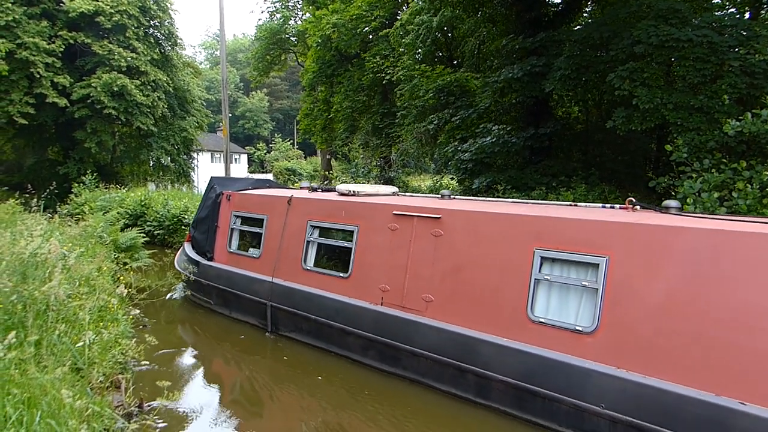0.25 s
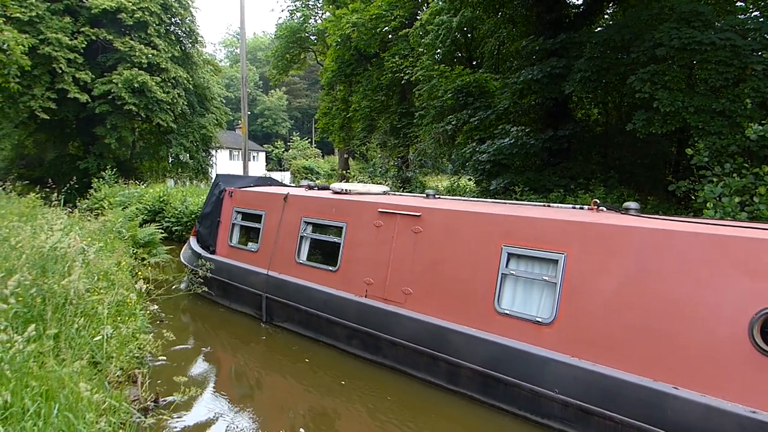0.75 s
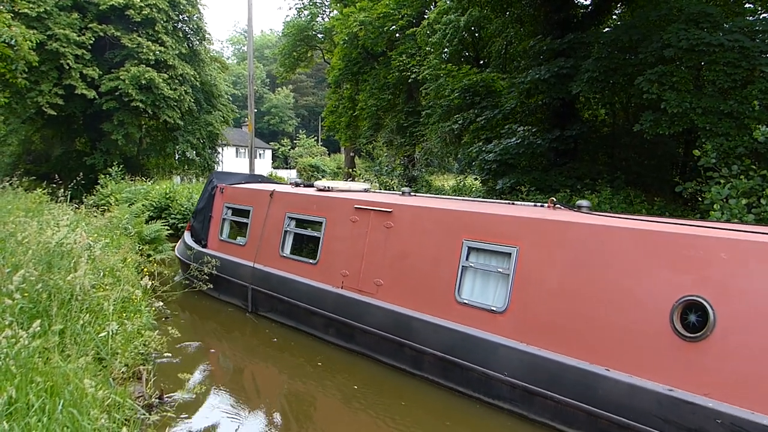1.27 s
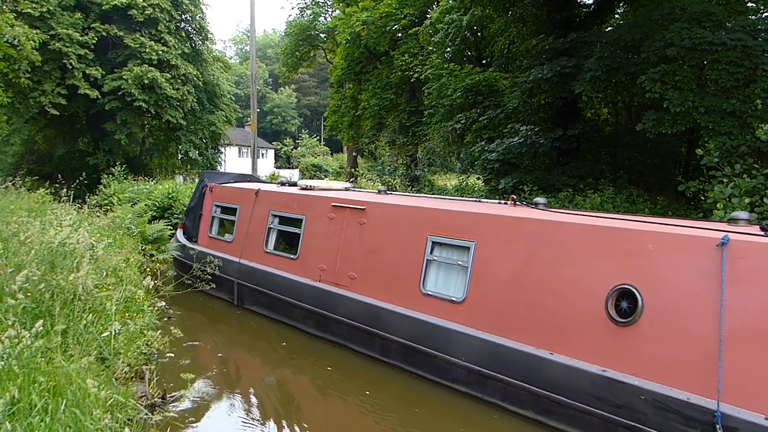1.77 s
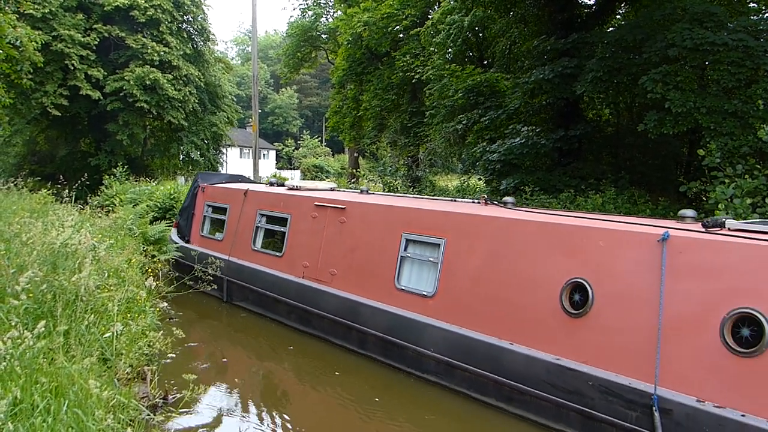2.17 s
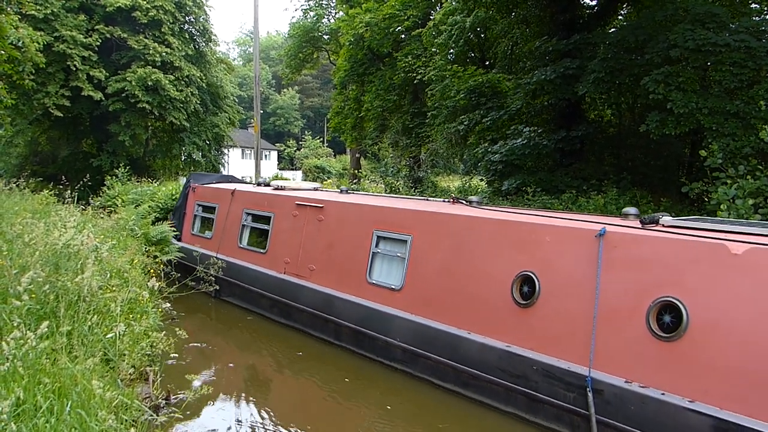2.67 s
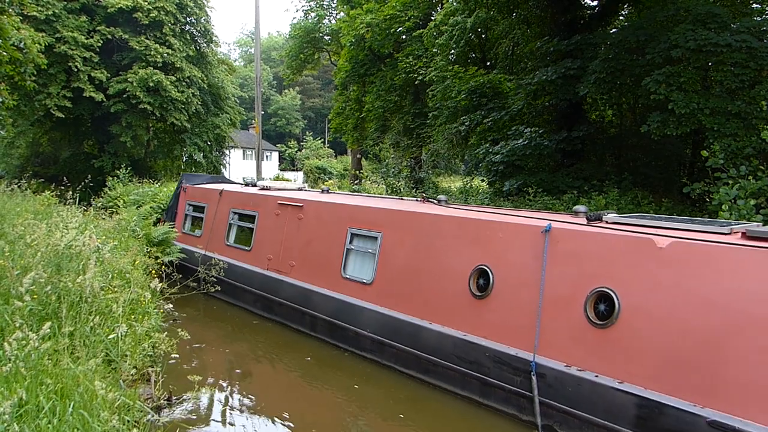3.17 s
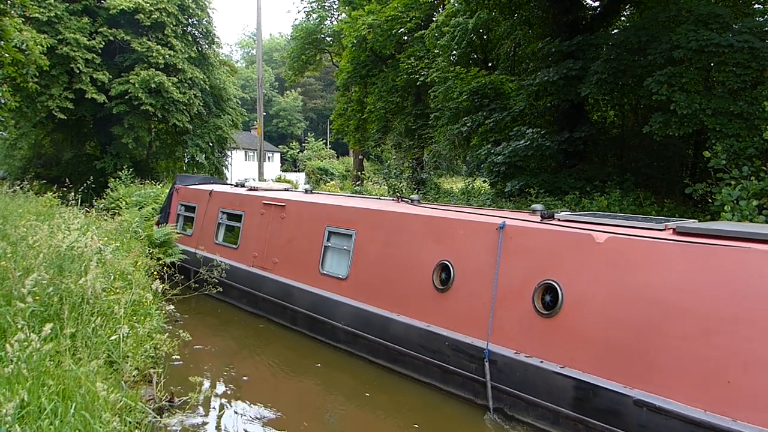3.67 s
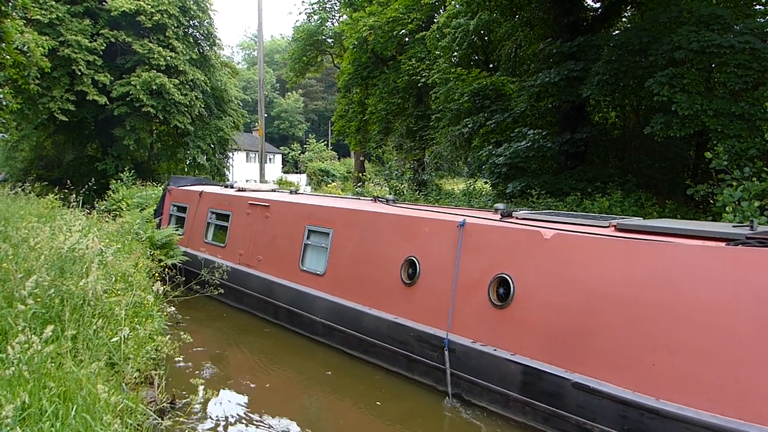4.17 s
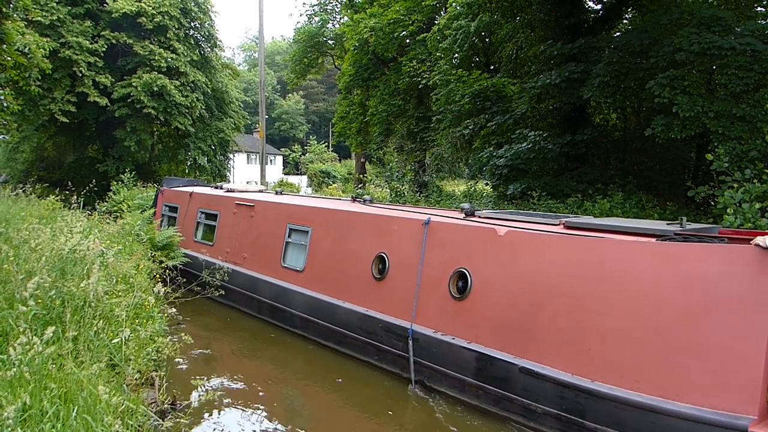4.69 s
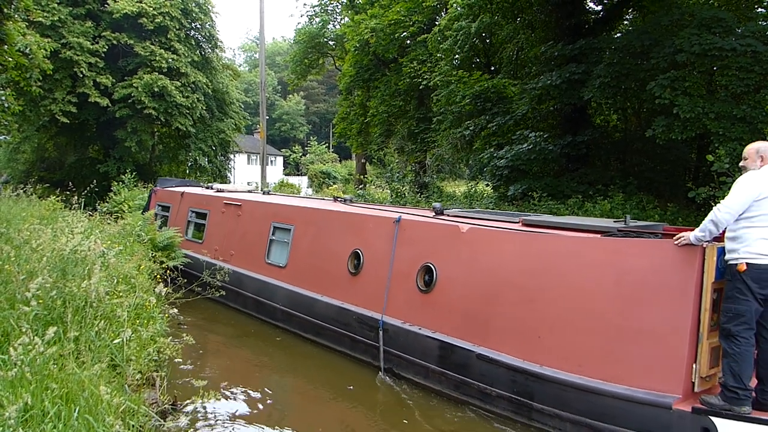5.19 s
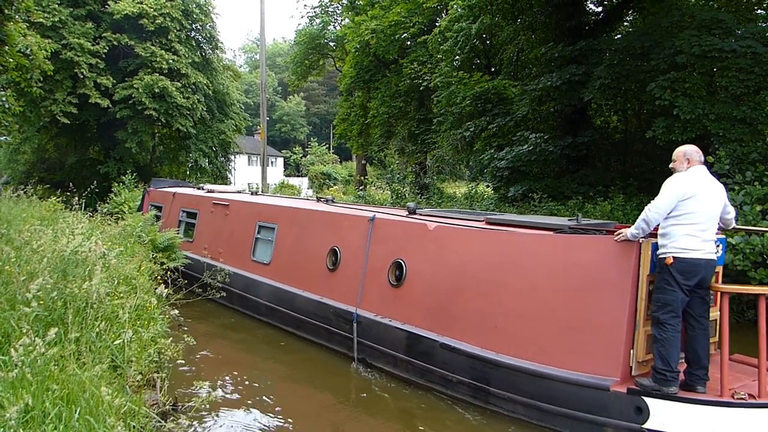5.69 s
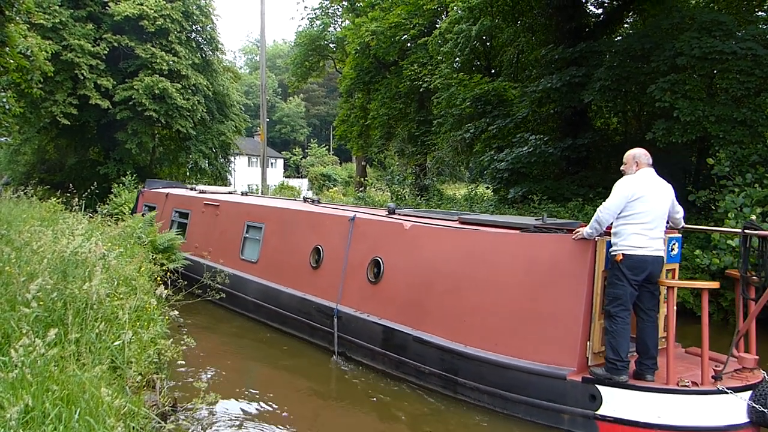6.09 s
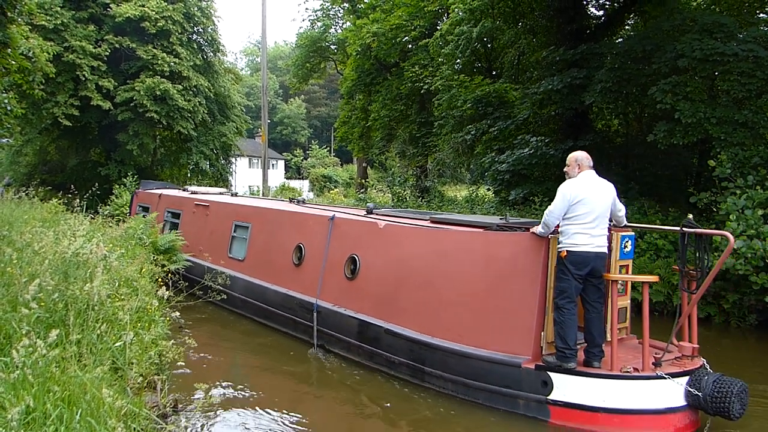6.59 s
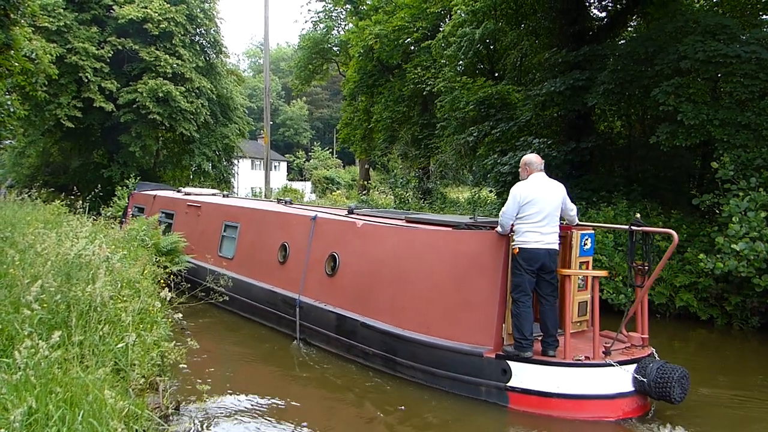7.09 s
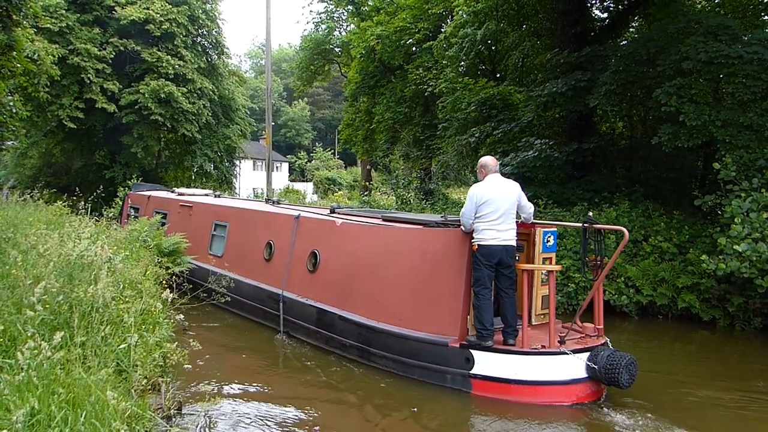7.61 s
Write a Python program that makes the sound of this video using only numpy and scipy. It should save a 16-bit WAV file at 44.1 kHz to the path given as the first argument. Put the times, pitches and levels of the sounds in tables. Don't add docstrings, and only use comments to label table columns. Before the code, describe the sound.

A narrow steel canal boat glides past at tick-over, close to a small stereo microphone on the grassy bank. A low bass hum underlies fast, uneven diesel knocks that ring and rattle the hull panels, mostly on the right. A bird whistles faintly over the leaves. After about four and a half seconds the stern comes by with pulsing exhaust hiss, gurgling cooling water, propeller wash, drops and light metal taps.

```python
import sys
import numpy as np
from scipy import signal
from scipy.fft import rfft, irfft, next_fast_len
from scipy.io import wavfile
from scipy.ndimage import uniform_filter1d, map_coordinates

SR = 44100
rng = np.random.default_rng(int(sys.argv[2]) if len(sys.argv) > 2 else 0)


def generate_wav(signal):
    frames = np.transpose(np.atleast_2d(signal))
    scaled = np.clip(frames, -1, 1) * 32767
    pcm = np.round(scaled).astype(np.int16)
    wavfile.write(sys.argv[1], SR, pcm)


def linear_from_db(decibels):
    return 10 ** (np.asarray(decibels, float) / 20)


N = 346185
T = np.arange(N) / SR

# [knock in low, middle, high and stern panels/dB, valve tick/dB, lateness/ms]
CYLINDERS = [
    (-3, -4.5, 3, -5, 6, 0.543),
    (1.5, -2.7, 11.3, -5.5, 1, 0.),
    (-5, -2, 7.3, -5, 0, 0.515),
    (-17, -0.5, 2.4, -4.5, -29, 0.98),
]
# [f/Hz, width/Hz, level/dB, panel group (whole part: low, middle, high, stern)]
PANELS = [(945, 74, 1.5, 0), (1060, 205, 4, 0), (730, 61, -10.5, -0.5), (1350, 190, 3.5, 1),
          (1600, 142, 6, 1.5), (2788, 290, 1, 2), (2473, 290, -2.5, 1), (1952, 115, 3, 3),
          (3310, 180, -5, 3.5), (4010, 330, -9, 3), (2860, 100, -10, 3), (4000, 230, -11.5, 3)]
# [t/s, peak level/dB, f/Hz]
HARD_KNOCKS = [(0.029, -13.5, 970), (0.304, -10, 1550), (0.413, -18, 1590), (0.491, -16, 1660),
               (0.525, -13.5, 1560), (0.55, -18.5, 930), (0.633, -15, 1550), (0.742, -16, 1590),
               (0.768, -15.5, 1420), (0.796, -16.5, 940), (0.905, -16, 960), (0.934, -16.5, 1610),
               (1.071, -18.5, 1410), (1.123, -15, 1530), (1.182, -15, 1550), (1.341, -18, 1570),
               (1.4, -16, 1480), (1.453, -17, 945), (1.509, -15.5, 1540), (1.538, -13, 1390),
               (1.563, -12.5, 1520), (1.62, -15.5, 1600), (1.65, -14, 1420), (1.674, -12, 975),
               (1.73, -16, 1400), (1.784, -13.5, 1010), (1.869, -19, 885), (1.951, -17, 1080),
               (2.088, -16, 930), (2.224, -10, 990), (2.278, -13, 1510), (2.332, -10.5, 945),
               (2.388, -18, 1060), (2.443, -12.5, 1020), (2.549, -14, 980), (2.609, -15, 1090),
               (2.636, -10, 1130), (2.662, -13.5, 990), (2.745, -14, 1360), (2.878, -18, 930),
               (2.938, -17, 1100), (2.965, -15, 1250), (2.994, -9.5, 945), (3.406, -17, 930),
               (3.568, -17, 1580), (3.6, -13.5, 1540), (3.625, -14, 1100), (3.65, -12.5, 980),
               (3.707, -10, 1060), (3.738, -15, 1070), (3.869, -11.5, 1040), (3.93, -15, 1040),
               (3.98, -13, 960), (4.04, -15, 1500), (4.067, -15, 1100), (4.091, -12, 1030),
               (4.204, -11, 980), (4.315, -13, 1030), (4.37, -16.5, 1130), (4.421, -13, 920)]
# [t/s, level/dB]
CHURN = [(0, -40), (1.5, -39.5), (3, -37), (4.4, -33.5), (4.75, -32), (5.05, -30.5), (5.15, -34.5),
         (5.22, -29), (6, -33.5), (6.5, -34), (7.1, -31), (7.3, -34.5), (7.36, -37), (7.65, -35.5),
         (7.85, -37.5)]


def evened(x):
    return x / np.sqrt(np.mean(x ** 2) + 1e-20)


def columns(rows, t):
    s, *values = np.transpose(rows)
    return [np.interp(t, s, v) for v in values]


def colour(x, points):
    f, db = np.transpose(points)
    size = next_fast_len(N + 8192, True)
    bins = np.fft.rfftfreq(size, 1 / SR)
    gain = linear_from_db(np.interp(np.log(bins + 1), np.log(f + 1), db))
    return irfft(rfft(x, size) * gain, size)[..., :N]


def resonate(x, hz, width, order=1):
    turn = np.exp(2j * np.pi * np.cumsum(hz * np.ones(x.shape[-1])) / SR)
    r = np.exp(-np.pi * width / SR)
    smooth = signal.lfilter([(1 - r) ** order], np.poly([r] * order), x * turn.conj())
    return 2 * (turn * smooth).real


def ring(x, hz, width):
    r, turn = np.exp(-np.pi * width / SR), 2 * np.pi * hz / SR
    stage = [2 * (1 - r) * np.sin(turn), 0, 0, 1, -2 * r * np.cos(turn), r * r]
    return signal.sosfilt([stage, stage], x)


def packet(hz, rise_s, fall_s, turn=0., glide=0.):
    t = np.arange(-5 * rise_s, 5 * fall_s, 1 / SR)
    shape = np.exp(np.where(t < 0, t / rise_s, -t / fall_s))
    return 5 * rise_s, shape * np.cos(2 * np.pi * (hz * t * (1 + glide * t) + turn))


def wander(per_s):
    knots = np.arange(0, N / SR + 1, 1 / per_s)
    drift = np.interp(T, knots, rng.standard_normal(400)[:len(knots)])
    return evened(uniform_filter1d(drift, int(SR / per_s)))


def add(mix, s, sound):
    at = max(round(s * SR), 0)
    part = mix[..., at:at + sound.shape[-1]]
    part += sound[..., :part.shape[-1]]


def placed(x, pan_db, lag=2):
    share = linear_from_db(pan_db) / (1 + linear_from_db(pan_db))
    return 2 * np.array([share * np.roll(x, lag), (1 - share) * x])


def delayed(x, s):
    return map_coordinates(x, [np.arange(N) - s * SR], order=3, mode="mirror")


def facing(at_s, peak_db, before, after, opening_db):
    opening_s, turn_s = 0.38, 0.49
    past = turn_s * np.logaddexp(0, (T - at_s) / turn_s)
    opening = np.clip(1 - T / opening_s, 0, 1)
    return peak_db + before * (T - at_s) + (after - before) * past + opening_db * opening


def in_view():
    clear_s, softness_s = 4.33, 0.7
    return 1 / (1 + np.exp((clear_s - T) / softness_s))


def water_db(rest_db, of_churn, view_db, of_surge):
    # [t/s, level/dB]
    surges = [
        (.06, 10.5),
        (4.72, 2),
        (5.02, -8),
        (5.2, -3),
        (5.64, 5.5),
        (6.96, 2),
        (7.1, -2),
        (7.28, 8.5),
        (7.6, 9),
    ]
    rise_s, fall_s, calm_db = 0.021, 0.098, -42
    surge_db = sum(db * np.exp(np.where(T < s, (T - s) / rise_s, (s - T) / fall_s)) for s, db in surges)
    churn_db = columns(CHURN, T)[0] - calm_db
    return rest_db + of_churn * churn_db + view_db * in_view() + of_surge * surge_db


def engine_cycles():
    # [t/s, cycle rate f/Hz]
    speed = [(0.0, 9.0856), (0.491, 9.1378), (0.981, 9.1191), (1.472, 9.0893), (1.962, 9.1073),
             (2.453, 9.1119), (2.944, 9.1015), (3.434, 9.0838), (3.925, 9.0684), (4.416, 9.061),
             (4.906, 9.0766), (5.397, 9.0968), (5.887, 9.0621), (6.378, 9.0492), (6.869, 9.0803),
             (7.359, 9.0681), (7.85, 9.0915)]
    return np.cumsum(columns(speed, T)[0]) / SR - .0249


def firing_times(cycles, late):
    return np.interp(np.arange(1, int(cycles[-1] * 4) + 2) / 4 + late, cycles, T, right=N / SR)


def exhaust(cycles):
    # [f/Hz, level/dB]
    pipe = [(30, -89), (55, -62), (73, -66), (109, -30.3), (145, -30.8), (182, -56), (230, -80),
            (900, -150)]
    # [f/Hz, level/dB]
    thump = [(40, -101), (64, -73), (82, -63), (100, -43.5), (127, -54), (165, -40.5), (195, -55),
             (218, -74), (245, -57.5), (300, -52), (360, -101), (381, -42.5), (400, -96), (900, -150)]
    # [f/Hz, level/dB]
    outlet = [(120, -120), (182, -139), (218, -38), (254, -38.5), (291, -54), (327, -45), (364, -47.5),
              (400, -52), (480, -107), (1200, -150)]
    boom_db = (0.8, -2, -1.1, 4)
    booms, puffs, thumps = np.zeros((3, N))
    luck = rng.standard_normal((400, 4))
    firings = firing_times(cycles, -.25)
    for k, s in enumerate(firings):
        add(booms, s + .0085, linear_from_db([boom_db[k % 4] + .5 * luck[k, 0]]) * SR / 72)
        add(puffs, s + .0119 + .0002 * luck[k, 1], linear_from_db([2. * luck[k, 2]]) * SR / 72)
    for k, s in enumerate(firings[::4]):
        add(thumps, s + .0603 + .0003 * luck[k, 1], linear_from_db([1.1 * luck[k, 3]]) * SR / -18)
    shake = linear_from_db(-43.5 + 0.55 * wander(21.0)) * np.cos(2 * np.pi * (8 * cycles - .43))
    boom = colour(booms, pipe) + colour(thumps, thump) + shake
    boom_facing_db = facing(at_s=4, peak_db=-0.5, before=0.5, after=-0.67, opening_db=1.2)
    puff_facing_db = facing(at_s=4, peak_db=1, before=1.6, after=-1.8, opening_db=.1)
    return placed(linear_from_db(boom_facing_db) * boom + linear_from_db(puff_facing_db) * colour(puffs, outlet), 0, lag=3)


def knocks(cycles):
    count, run_s, run_gain_db, blow_spread_db = 5, .009, 2., 2.
    panel_spread_db, give_way_db = 1.5, -12
    damping = 1.4
    sag_per_s = (0, .015, 0, 0)
    groups, s = np.zeros((4, N)), firing_times(cycles, 0)
    cylinder = np.array(CYLINDERS)[(np.arange(len(s)) + 1) % 4]
    luck = rng.standard_normal((len(s), len(PANELS) + 1, count + 1))
    place = (np.arange(count) + rng.random((len(s), count))) / count
    blow_s = s[:, None] + cylinder[:, 5:] / 1000 - 0.005 + run_s * place
    at = np.clip(blow_s * SR, 0, N - 1).astype(int)
    covered = abs(s[:, None] - 0.002 - np.array(HARD_KNOCKS)[:, 0]).min(1) < 0.009
    for j, (hz, width, db, group) in enumerate(PANELS):
        g, blows = int(group), np.zeros(N)
        firing_db = db + cylinder[:, g] + panel_spread_db * luck[:, j, 0] + luck[:, -1, 0]
        firing_db = firing_db + give_way_db * covered * (g < 2)
        blow_db = firing_db[:, None] + run_gain_db * place + blow_spread_db * luck[:, -1, 1:]
        np.add.at(blows, at, linear_from_db(blow_db) * np.sign(luck[:, j, 1:]) / width)
        if sag_per_s[g]:
            groups[g] += resonate(blows, hz * (1 - sag_per_s[g] * T), damping * width, order=2)
        else:
            groups[g] += ring(blows, hz, damping * width)
    return groups


def rattle(cycles):
    size = next_fast_len(N)
    f, rings = np.fft.rfftfreq(size, 1 / SR), np.zeros((4, 1, size // 2 + 1))
    for hz, width, db, group in PANELS:
        off = (f - hz) / width
        rings[int(group), 0] += linear_from_db(db) / np.sqrt(1 + off ** 2) / (1 + (off / 0.82) ** 2)
    shake_db = 1.24 * wander(30.) + 2.6 * np.cos(2 * np.pi * (4 * cycles + 0.26))
    shake = rng.standard_normal((2, N)) * linear_from_db(shake_db)
    return irfft(rings * rfft(shake, size), size)[..., :N]


def hard_knocks(level_db):
    # [t after its start/s, level/dB]
    hard_run = [
        (-.0005, -8),
        (.0025, -4),
        (.006, -8),
    ]
    out = np.zeros(N)
    for s, db, hz in HARD_KNOCKS:
        lead, sound = packet(hz, 0.0009, 0.0018)
        for late, blow_db in hard_run:
            add(out, s + late + rng.random() / hz - lead, linear_from_db(db + blow_db - 1.9) * sound)
        for other_hz, _, panel_db, group in PANELS:
            lead, sound = packet(other_hz, 0.0011, 0.0016, turn=rng.random())
            spread_db = panel_db + level_db[int(group)][round(s * SR)] + 18.0
            add(out, s + 0.00194 - lead, linear_from_db(db + spread_db) * sound)
    return out


def hull(cycles):
    # [t square on/s, level then/dB, slope before/(dB/s), slope
    # after/(dB/s), shift at the opening/dB]
    group_facing = [
        (5.1, -33, 1.3, -5, -2),
        (5.7, -41.5, -0.44, -9.5, 2.5),
        (1.57, -38.5, 2.8, -2.5, -16),
        (7.2, -43.5, 3.5, 2, 25),
    ]
    level_db = [facing(*row) for row in group_facing]
    knock_groups, rattle_groups = knocks(cycles), rattle(cycles)
    knock_over_rattle = linear_from_db(np.array([6.5, 6.5, 2, 0]))
    share = knock_over_rattle / np.sqrt(1 + knock_over_rattle ** 2)
    near, wide = hard_knocks(level_db), np.zeros(N)
    for g in range(4):
        knock = share[g] * evened(knock_groups[g])
        between = np.sqrt(1 - share[g] ** 2) * evened(rattle_groups[g, 0])
        near += linear_from_db(level_db[g]) * (knock + between)
        wide += linear_from_db(level_db[g] - 19.0) * evened(rattle_groups[g, 1])
    return placed(near, -23.5 + 2.5 * T) + wide * [[1], [0]]


def valves(cycles):
    out = np.zeros(N)
    for k, (s, (a, b)) in enumerate(zip(firing_times(cycles, 0.01147), rng.standard_normal((400, 2)))):
        lead, sound = packet(4110 + 80 * a, 0.0008, 0.0018)
        add(out, s - lead, linear_from_db(CYLINDERS[(k + 1) % 4][4] + 3 * b) * sound)
    level_db = facing(at_s=3.5, peak_db=-37.5, before=2.2, after=-1, opening_db=9)
    return placed(linear_from_db(level_db) * out, 5.0)


def gurgle():
    out = np.zeros((2, N))
    for u, p, size, side in rng.random((400, 4)):
        hz = 330 * 4.52 ** p
        sound = packet(hz, 1. / hz, 8.9 / hz, glide=0.0142 * hz)[1]
        level_db = -2. * np.log(size + 0.019)
        add(out, u * N / SR, linear_from_db(level_db) * placed(sound, -4. + 8.8 * (side - .5), lag=0))
    return evened(out)


def stern(cycles):
    # [t/s, fizz f/Hz, hiss f/Hz]
    glance = [(0, 9700, 4980), (.35, 10100, 5800), (.7, 10900, 5500), (1.5, 10100, 5430), (2.4, 9300, 5530),
              (2.6, 10500, 5600), (3.4, 10300, 5440), (3.7, 9150, 5530), (4.5, 9060, 5500),
              (7.85, 8460, 5860)]
    # [f/Hz, level/dB]
    fizz_colour = [(3820, -60), (6300, -8), (7040, 3.5), (8820, -1), (10100, -5), (13000, -20.5),
                   (14400, -22), (15500, -46)]
    hiss_db = water_db(rest_db=-45, of_churn=0.4076, view_db=-1.5, of_surge=0.32)
    fizz_db = water_db(rest_db=-51, of_churn=1.07, view_db=-5, of_surge=0.27)
    gurgle_db = water_db(rest_db=-54, of_churn=0.01, view_db=8, of_surge=1.81)
    fizz_hz, hump_hz = columns(glance, T)
    puff = np.cos(2 * np.pi * (4 * cycles + 0.32))
    a, b, c = rng.standard_normal((3, N))
    port_lag_s = 70e-6 * (1 - in_view())
    pair = np.array([delayed(a, port_lag_s) + 0.8 * b, a + 1.1 * c])
    off_water = np.array([delayed(pair[0], 1.06 * 3 / fizz_hz), delayed(pair[1], 3 / fizz_hz)])
    pair += .4 * in_view() * off_water
    sparks = linear_from_db(7 * np.minimum(rng.exponential(1, N), 4.)) * (rng.random(N) < 900 / SR)
    grit = 1 + .3 * evened(signal.lfilter([1], [1, -.97], sparks))
    pair *= grit * linear_from_db(1.14 * wander(25.))
    hiss = evened(resonate(pair * linear_from_db(1.5 * puff), hump_hz, 1760, order=2))
    fizz = evened(colour((pair - 0.051 * pair.mean(0)) * linear_from_db(3.3 * puff), fizz_colour))
    fizz = evened(fizz + 0.57 * in_view() * resonate(fizz, fizz_hz, 420))
    lean = linear_from_db(np.array([[.25], [-.25]]))
    return lean * (linear_from_db(hiss_db) * hiss + linear_from_db(fizz_db) * fizz) + linear_from_db(gurgle_db - 4.0) * gurgle()


def glints(cycles):
    # [t/s, half length/s, f/Hz, slope/(Hz/s), width/Hz]
    glint_rows = [(2.5, .55, 6750, -300, 400), (.5, .35, 6400, -700, 500), (1.5, .6, 8300, -400, 500),
                  (7.2, .6, 7700, 0, 400), (.15, .25, 9700, 0, 900), (1.25, .55, 10450, -650, 700),
                  (2., .5, 9500, -800, 600), (3., .5, 10600, 300, 900), (4.1, .55, 8750, 0, 600),
                  (1., .7, 11700, 0, 600), (1., .9, 3320, -60, 330), (.55, .45, 4650, 0, 400),
                  (1.3, .6, 5600, -500, 600), (2.6, .8, 5250, 0, 600), (2.3, .6, 3900, 0, 300),
                  (6.3, 1.5, 12900, 0, 1500), (4.1, .5, 12000, 0, 2500)]
    glint_db = [-48, -55, -64, -57, -54, -55.5, -55, -57, -46, -70, -47, -42, -49, -56, -56, -63, -65]
    out = np.zeros(N)
    for (s, half, hz, slope, width), db in zip(glint_rows, glint_db):
        span = slice(round(max(s - 2 * half, 0) * SR), round((s + 2 * half) * SR))
        t = T[span] - s
        pulse = np.cos(2 * np.pi * (4 * cycles[span] + (.33 if hz > 5000 else .05)))
        gas = rng.standard_normal(len(t)) * linear_from_db(5 * pulse)
        band = evened(resonate(gas, hz + slope * t, width, order=2))
        out[span] += linear_from_db(db - 7 * (t / half) ** 2) * band
    return np.array([linear_from_db(-6.0) * np.roll(out, 3), out])


def wash():
    # [f/Hz, level/dB]
    wash_colour = [(110, -22), (180, -2), (249, -13.5), (278, -5.5), (336, -1.5), (570, -10.5), (980, 1.5),
                   (1710, -11.5), (1930, -11), (2400, -18), (4600, -19.5), (5980, -48), (10100, -120)]
    # [t/s, peak level/dB, f/Hz]
    glugs = [(4.535, -14, 960), (4.611, -27, 930), (4.666, -12.5, 800), (4.75, -11.5, 1060),
             (4.783, -17, 990), (4.862, -19, 920), (4.976, -7, 934), (5.115, -14, 1390), (5.187, -37, 960),
             (5.25, -22, 810), (5.526, -8, 990), (5.635, -10, 980), (5.744, -15, 1010), (6.012, -11, 1000),
             (6.076, -11, 1030), (6.295, -32, 1010), (6.382, -13, 1020), (6.517, -17, 1020),
             (6.784, -10, 1200), (7.092, -8, 1180), (7.195, -8, 844), (7.678, -22, 1080)]
    a, b, c = rng.standard_normal((3, N))
    lumps = linear_from_db(columns(CHURN, T)[0] + 1.4 * wander(40.) + .4 * wander(8.))
    pair = np.array([np.roll(a, 3) + 0.5 * b, a + 0.78 * c])
    out = lumps * evened(colour(pair, wash_colour)) * linear_from_db([[-2.5], [2.]])
    for s, db, hz in glugs:
        lead, sound = packet(hz, 0.0015, 0.0042, glide=4.4)
        add(out, s + 0.00184 - lead, linear_from_db(db - 8.5) * placed(sound, -7.5))
    return out


def air():
    # [f/Hz, level/dB]
    air_colour = [(12, -47), (20, -6.5), (207, 9.5), (372, 13.5), (746, -16.5), (1040, -9), (1920, -4),
                  (2150, 1.5), (2840, -8), (3540, -21), (4070, -15), (8880, -14.5), (12400, -32),
                  (14300, -30), (15500, -72)]
    return linear_from_db(-41.5 + 1. * wander(2.95)) * evened(colour(rng.standard_normal((2, N)), air_colour))


def drops():
    # [t/s, peak level/dB, f/Hz, left minus right/dB]
    drop_rows = [(0.0376, -23, 4760, -8), (0.2533, -25, 4920, -4.0), (0.431, -25, 4930, 1),
                 (0.7845, -25, 5700, -2.5), (1.4461, -31, 5610, -3.0), (3.0064, -19.5, 5300, -1.5),
                 (4.0028, -29, 5500, -1.0), (4.6443, -28, 5400, 5), (4.7441, -34, 5140, -2.5),
                 (4.8544, -28, 4220, -2), (4.996, -22, 4170, -1.0), (5.367, -15.5, 5900, -10),
                 (5.454, -22, 5930, -7), (5.6068, -25, 5740, -2.5), (5.6421, -35, 5790, -3),
                 (5.667, -29, 5760, 14), (6.1245, -27, 6300, 1), (6.144, -22, 6020, -4),
                 (6.3375, -34, 5320, -1.5), (6.3839, -25, 6050, -2.5), (6.4233, -28, 6740, 1),
                 (6.4906, -29, 6300, -2.0), (6.6883, -23, 6050, -2.5), (6.9691, -28, 8540, -2.5),
                 (6.9825, -19.5, 5980, -1.0), (7.2752, -18, 6900, 4), (7.624, -24.5, 6100, -3),
                 (7.639, -18.5, 4940, -1.0), (7.7315, -29, 5610, 2)]
    out = np.zeros((2, N))
    for s, db, hz, pan_db in drop_rows:
        lead, sound = packet(hz, 0.0005, 0.00032, turn=rng.random(), glide=11.0)
        add(out, s + 0.000846 - lead, linear_from_db(db + 1.5) * placed(sound, pan_db, lag=0))
        add(out, s + 0.0048 - lead, linear_from_db(db - 5.0) * placed(sound, pan_db, lag=0))
        burst = rng.standard_normal((2, 400)) * np.exp(-np.arange(400) / 110.0)
        add(out, s, linear_from_db(db - 6) * resonate(burst, 6500, 4600, order=2))
    return out


def blackbird():
    # [t/s, length/s, from f/Hz, to f/Hz, peak level/dB]
    glides = [
        (2.19, .07, 2230, 2350, -48),
        (2.48, .115, 1650, 1950, -47),
        (2.74, .2, 2500, 2350, -42.5),
        (4.1, .085, 1990, 1850, -43),
        (4.1, .1, 2480, 2350, -49),
        (4.178, .12, 2620, 2750, -52),
        (4.03, .17, 7280, 7190, -54),
        (.735, .095, 7120, 6980, -57),
        (.28, .08, 6650, 6720, -58),
        (.52, .07, 6900, 6650, -60),
    ]
    # [t/s, f/Hz, level/dB]
    arched = [
        (3.915, 2180, -50),
        (3.97, 2320, -45),
        (4.05, 2450, -41),
        (4.075, 2330, -43),
        (4.09, 2260, -52),
    ]
    top, ends_db = .4, -8
    notes = [arched]
    for s, length, a, b, db in glides:
        peak = (s + top * length, a + top * (b - a), db)
        notes.append([(s, a, db + ends_db), peak, (s + length, b, db + ends_db)])
    out = np.zeros(N)
    for rows in notes:
        t = np.arange(rows[0][0], rows[-1][0], 1 / SR)
        hz, db = columns(rows, t)
        flutter_db = 2.3 * evened(uniform_filter1d(rng.standard_normal(len(t)), 600))
        tone = np.sin(2 * np.pi * np.cumsum(uniform_filter1d(hz, 500)) / SR)
        add(out, t[0], linear_from_db(db + 5.0 + flutter_db) * tone * signal.windows.tukey(len(t), .15))
    leaves = rng.standard_normal((2, 6000)) * linear_from_db(-60 * np.arange(6000) / SR / 0.47)
    echo = signal.fftconvolve(out[None], leaves / np.linalg.norm(leaves[0]), axes=1)[:, :N]
    return placed(out, 10, lag=0) + linear_from_db(-5) * echo


def stern_taps():
    # [t/s, peak level/dB, f/Hz]
    taps = [(4.4248, -32, 2880), (4.5645, -23, 2150), (4.775, -25, 2310), (4.976, -22.5, 2220),
            (5.1092, -32, 1920), (5.205, -28, 1940), (5.4524, -22, 2110), (5.5273, -28, 2860),
            (5.7473, -28, 2900), (5.8291, -24, 1930), (5.8555, -26.5, 2890), (5.884, -25, 1960),
            (5.9393, -31, 2820), (5.9952, -30, 1910), (6.0512, -24, 1920), (6.08, -29, 1890),
            (6.1045, -25, 1940), (6.2157, -30, 1990), (6.3, -37, 2090), (6.325, -25, 1920),
            (6.354, -31, 1940), (6.3833, -27, 1910), (6.5185, -27, 1930), (6.5473, -23, 1920),
            (6.5948, -31, 1930), (6.6597, -24, 1870), (6.6856, -24, 1900), (6.7699, -20.5, 1900),
            (6.8792, -31, 1930), (6.987, -27, 2000), (7.072, -21.5, 1900), (7.291, -28, 1990),
            (7.3152, -26, 1910), (7.3463, -28, 1930), (7.3751, -22, 1930), (7.4529, -44, 1880),
            (7.623, -40, 1830), (7.6764, -24, 2050), (7.7527, -24, 1780), (7.8156, -25, 1890)]
    out = np.zeros(N)
    for s, db, hz in taps:
        lead, sound = packet(hz, 0.0008, 0.0057, turn=rng.random())
        add(out, s + 0.00149 - lead, linear_from_db(db - 4.0) * sound)
    return placed(out, -1.0)


def scene():
    cycles = engine_cycles()
    engine = exhaust(cycles) + hull(cycles) + valves(cycles)
    water = stern(cycles) + glints(cycles) + wash() + drops()
    return engine + water + air() + blackbird() + stern_taps()


def roll_off(x):
    return signal.sosfilt(signal.butter(12, 15710, fs=SR, output="sos"), x)


def record(dry):
    return roll_off(dry)


dry = scene()
out = record(dry)
generate_wav(out)
```